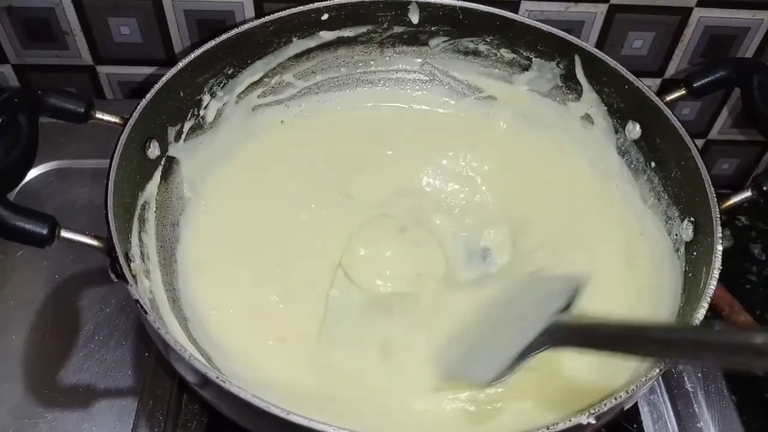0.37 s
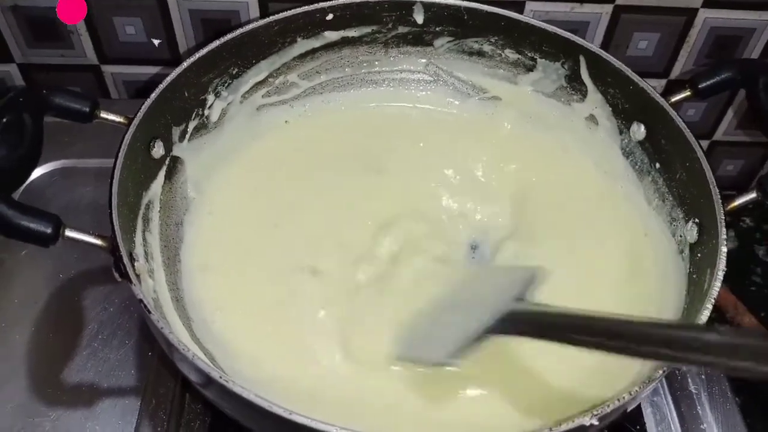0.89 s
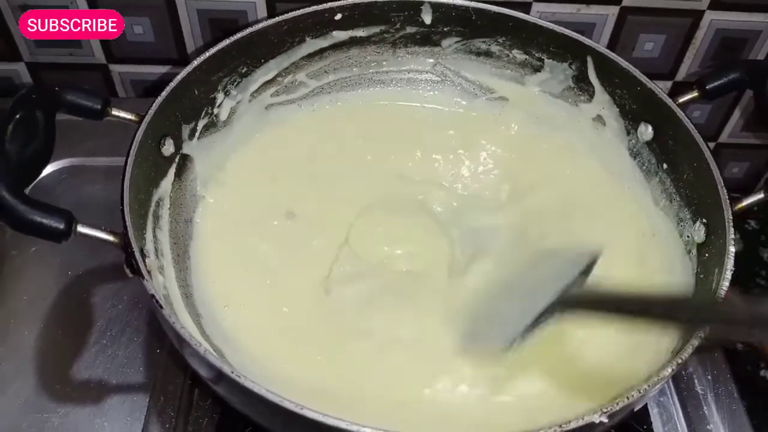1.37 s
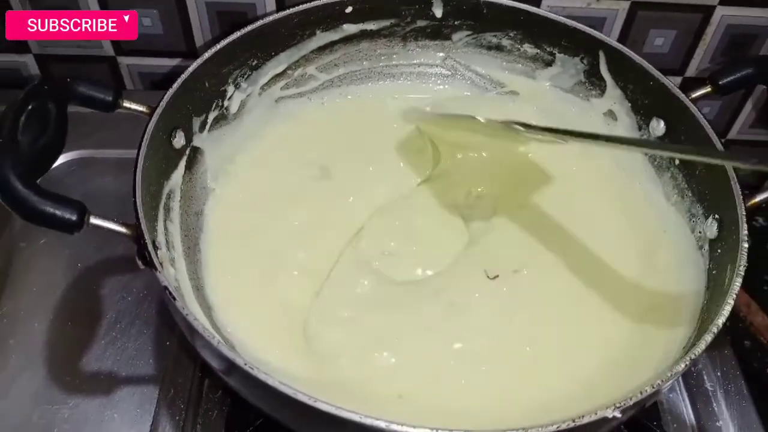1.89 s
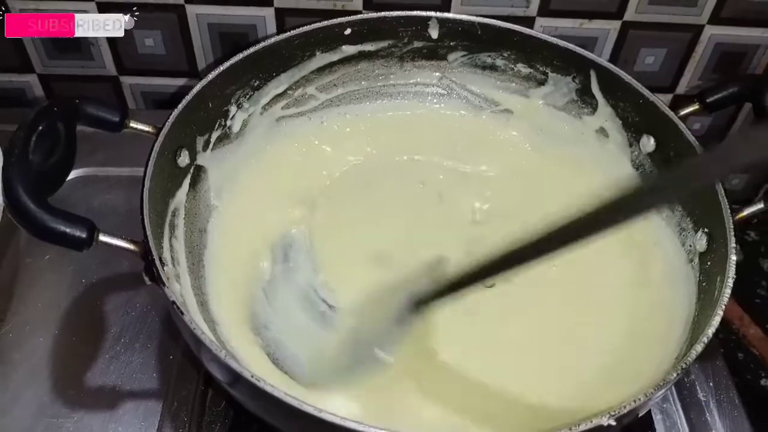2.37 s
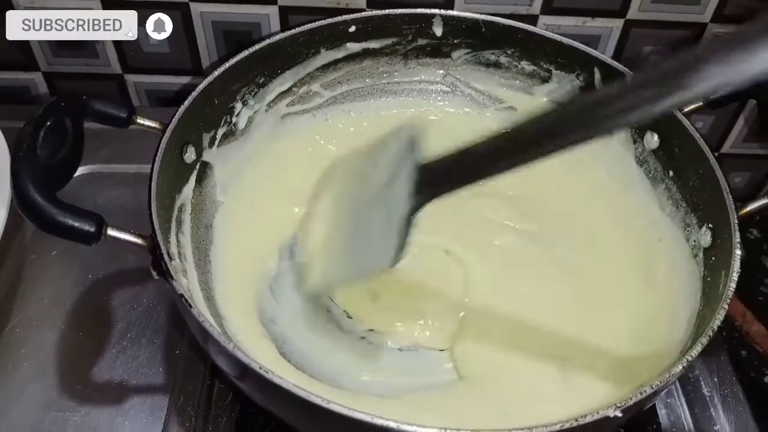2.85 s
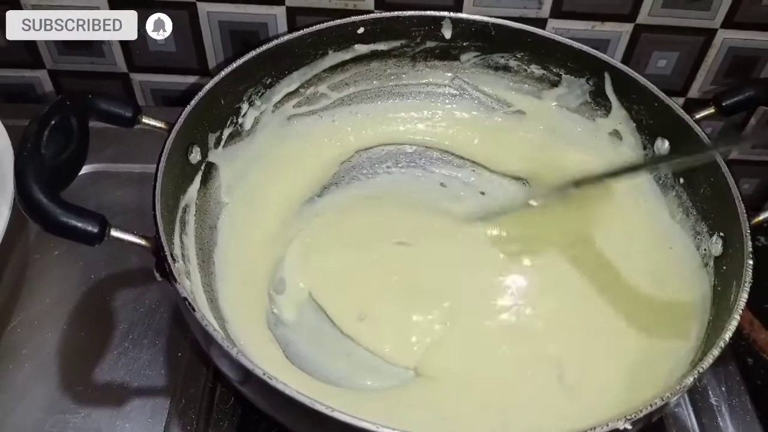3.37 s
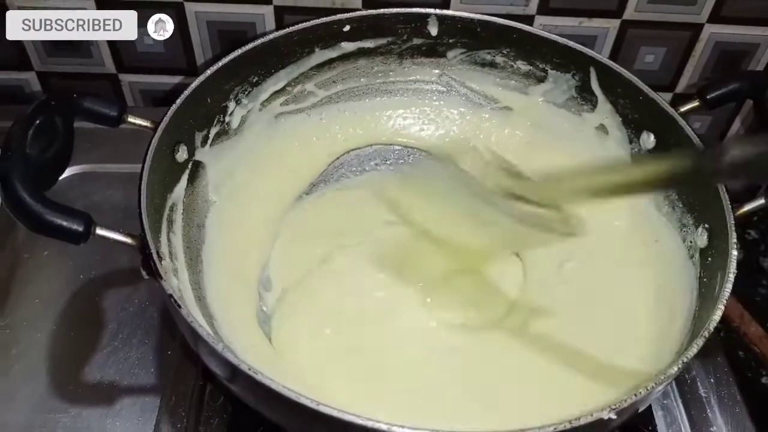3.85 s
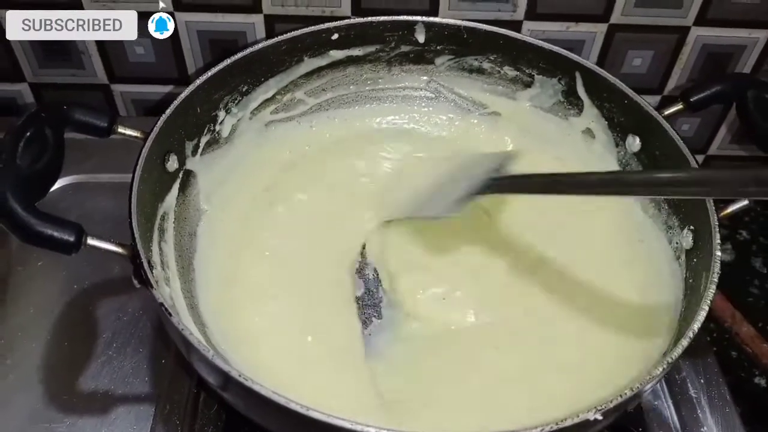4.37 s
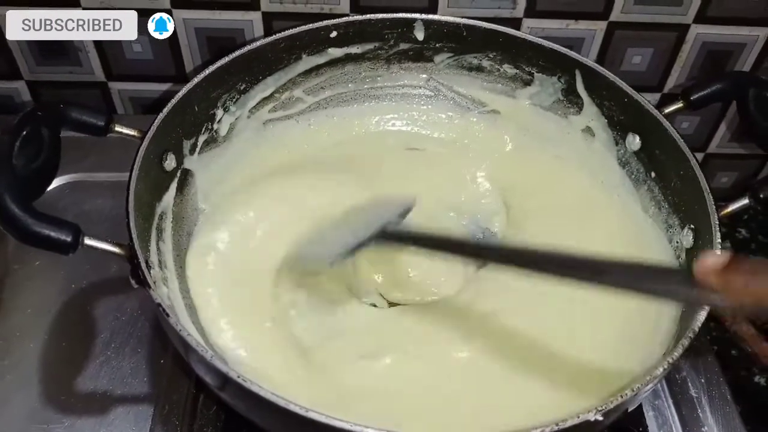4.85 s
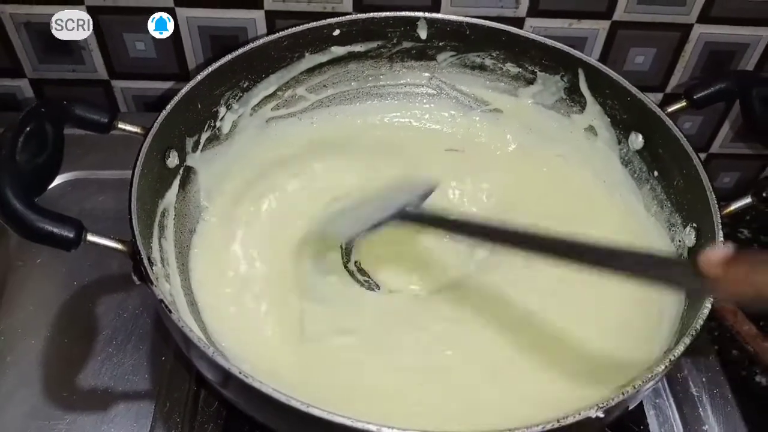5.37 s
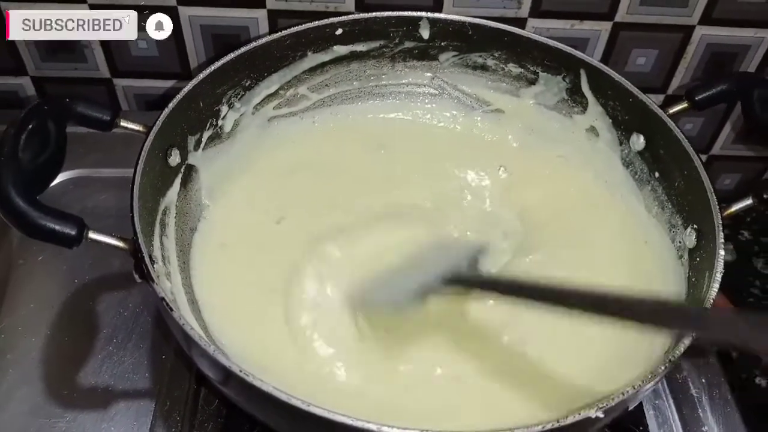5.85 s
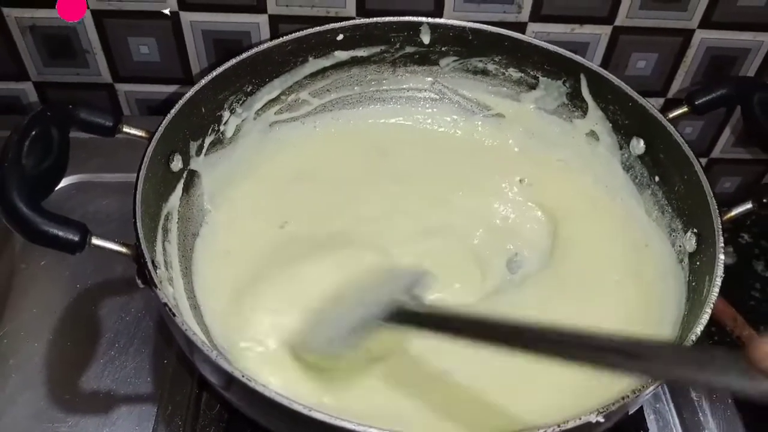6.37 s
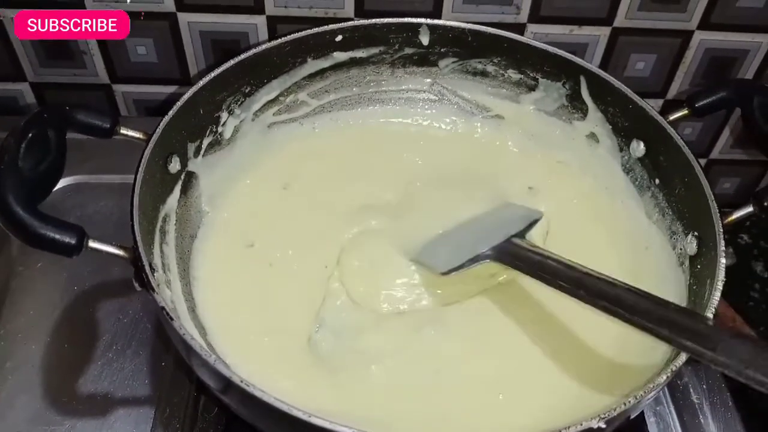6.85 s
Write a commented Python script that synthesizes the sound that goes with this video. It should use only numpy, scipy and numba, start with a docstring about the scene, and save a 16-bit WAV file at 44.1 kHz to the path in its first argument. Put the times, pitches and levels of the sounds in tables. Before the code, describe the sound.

A spatula rasps in repeated sweeping strokes through thick sauce in a metal pan, with sharp scraping knocks and a faint bird calling outside.

```python
"""A steel spatula stirs a thick sauce in a deep pan on a kitchen stove, close to a phone, for seven seconds.
From the start a steady room rumble and hiss lie under the strokes: stick-slip friction feeds damped pan modes.
Soon a bird outside repeats calls of falling whistles, and a narrow resonance trills as an insect now and then.
Then the edge also begins to knock the pan: short force pulses ring the same modes.
Strokes and knocks go on to the end, the edge running up the side wall in three spells."""
import sys
import numpy as np
from scipy import signal
from scipy.fft import rfft, irfft, next_fast_len
from scipy.io import wavfile
from scipy.ndimage import uniform_filter1d
from numba import njit

SR = 44100
rng = np.random.default_rng(int(sys.argv[2]) if len(sys.argv) > 2 else 0)


def to_linear_factor(level_db):
    """Convert decibel levels (scalar or array-like) to linear amplitude factors."""
    exponent = np.asarray(level_db, float) / 20
    return 10 ** exponent


def digitize_waveform(pressure):
    """Quantize a signal to 16-bit integers and store it at the path in sys.argv[1].

    Rows of a 2-D input are taken as channels; values are limited to [-1, 1].
    """
    field = np.atleast_2d(pressure).T
    bounded = np.clip(field, -1, 1)
    quanta = np.round(bounded * 32767).astype(np.int16)
    wavfile.write(sys.argv[1], SR, quanta)


N = 307818
T = np.arange(N) / SR
BANDS_HZ = 30 * 2 ** np.arange(0, 9, 1 / 3)

# Sweeps of the edge over the pan. Each row: time of full pressure in s, time since landing in s,
# time until lifting in s, rasp level in dB, wall ring and blade ring in dB relative to the rasp.
STROKES = [(0.03, 0.15, 0.24, -32, -6, -7.5), (0.234, 0.068, 0.049, -36, -12.5, -14),
           (0.548, 0.15, 0.3, -35.5, -5, -2.5), (.77, 0.088, 0.076, -37.5, -9, -10),
           (0.928, 0.049, 0.031, -49.5, -9, -9), (1.112, 0.2, 0.17, -34, -4.5, -4.5),
           (1.288, 0.13, 0.069, -36, -4, -10.5), (1.55, 0.062, 0.42, -42.5, -20, -7),
           (1.709, .21, 0.1, -31, -5.5, -5), (1.971, 0.075, 0.23, -49, 9.5, -26),
           (2.18, 0.21, 0.38, -41, 5.5, -18), (2.44, 0.18, 0.18, -33.5, -4, -6.5),
           (2.57, 0.17, 0.085, -36.5, -3.5, -12), (3.038, 0.013, 0.079, -36, 9, -10),
           (3.361, 0.28, 0.2, -34.5, 3.5, -8.5), (3.519, 0.29, 0.12, -34, -4.5, -7),
           (3.642, 0.012, 0.069, -41, 0, -1), (4.149, 0.052, 0.32, -36, -1, -8),
           (4.289, 0.2, 0.14, -33.5, -2, -3), (4.42, 0.063, 0.045, -44.5, -5.5, -2),
           (4.495, .01, 0.049, -47.5, -6, -11), (4.635, 0.014, 0.039, -44.5, 3, 3),
           (4.811, 0.21, 0.2, -32, -5, -4), (5.039, 0.089, 0.049, -33.5, -9, -13),
           (5.182, 0.022, 0.055, -38.5, -0.5, 0), (5.388, 0.17, 0.17, -30, -4.5, -5),
           (5.59, 0.057, 0.078, -31, -7.5, -11.5), (5.779, 0.023, 0.034, -46.5, -4, 1.5),
           (5.931, 0.14, .16, -32.5, -3.5, -4.5), (6.111, 0.082, 0.051, -42, -5, -5.5),
           (6.341, 0.086, 0.33, -34.5, -8.5, -2.5), (6.457, 0.18, 0.16, -33, -4.5, -10),
           (6.649, 0.17, 0.047, -43, -5, -21), (6.89, 0.044, 0.14, -41, 0, -1)]
# Share of the rasp's swell in dB that is followed. In order: by wall ring, by blade ring.
SWELL_SHARE = [0.99, 1]
# Knocks of the edge. Each row: start in s, treble level in dB, boom and wall ring in dB relative to the treble.
KNOCKS = [(0.4163, -41.5, -1, 10), (0.724, -24, -14, -3), (1.128, -33, -21, -2.5), (1.499, -39, -9, -15),
          (1.7146, -19, -12, -1), (1.9009, -29, -6, 11), (2.0048, -42, -16, 23), (2.1217, -29.5, -2, 3),
          (2.196, -39, -27, 12), (2.316, -42.5, 7, 22), (2.444, -27.5, -32, 0), (2.473, -39, 6, -14),
          (2.513, -28, -22, 12), (3.0277, -19, 1.5, 16), (3.0407, -32, 10, 7), (3.316, -32, -17, 13),
          (3.38, -34, -3, 9.5), (3.407, -28, -3, 10.5), (3.6335, -30.5, -11, -5),
          (4.1069, -15.5, -1.5, -3.5), (4.488, -33, -28, -8.5), (4.4955, -39, -20, -6),
          (4.6251, -39, -8, 5), (5.172, -49, -25, 0), (5.768, -47.5, -14, 12), (6.091, -30.5, -12, -7),
          (6.2573, -46.5, 0, 9), (6.542, -36.5, -10, 12), (6.855, -30, -11, -2), (6.8696, -21.5, -8, -6),
          (6.8967, -39, 13.5, -21.5)]
# Build-up time constants of a knock. In order: boom, wall ring, blade ring and treble, in s.
BUILD_S = [0.0021, 0.0017, .0004, 0.00049]
# Decay time constants of a knock. In order: boom, wall ring, blade ring and treble, in s.
RATTLE_S = [0.0046, 0.003, 0.0033, 0.0046]
# Pan modes, damped by the sauce. Each row: frequency in Hz, 60 dB decay time in s,
# level in dB relative to the ring level, gain in dB while the edge runs up the side wall.
PAN_MODES = [(145, 0.054, -13.5, 4), (232, 0.096, 5.5, 2.5), (324.2, 0.1, 6.5, 0.5),
             (452.6, 0.064, 1.5, -7.5), (530.8, 0.11, 3.5, -1), (643.4, 0.22, -14.5, 7),
             (797, 0.054, -19.5, 3.5), (1087, 0.028, -9.5, 9), (1296.5, 0.05, -4, 6.5),
             (1426, 0.23, -7.5, -9), (1619, 0.08, -1.5, -16), (1738, 0.029, 3, -7.5),
             (2177, 0.02, -12.5, 9.5), (2582, 0.089, -5.5, -0.5), (2768, 0.058, -4, -2.5),
             (3060, 0.026, -10, 0.5), (3280, 0.09, -6, -9), (3544, 0.062, -9, -1), (4043, 0.018, -16, 10),
             (4800, 0.023, -12.5, -0.5), (5640, 0.041, -9.5, -2), (6360, 0.0021, -7, 4),
             (6757, 0.02, -4, -0.5), (7330, 0.011, -15, 5)]
# Broad rasp between the modes. Each row: frequency in Hz, level in dB per third octave relative to the bare edge.
RASP_SPECTRUM = [(100, -23), (200, -8), (400, -8.5), (900, -21.5), (1400, 8.5), (2000, -30), (2500, 7.5),
                 (3200, 6.5), (3600, -0.5), (5000, -1.5), (7000, -7), (10000, -69.5), (13000, -15)]
# Low bowl modes come and go as the edge crosses their nodes. Each row: time in s,
# level in dB below 280 Hz, from 280 to 390 Hz, from 390 to 720 Hz.
LOW_DRAG = [(0.0, -47, -56.5, -38), (0.15, -69, -67, -50.5), (0.21, -46, -79, -68), (0.25, -49, -59, -80),
            (0.37, -100, -86, -78), (0.449, -62, -48.5, -54), (0.52, -44, -54, -61),
            (0.58, -47.5, -56, -80), (0.62, -49, -58, -43.5), (0.72, -48, -59, -67), (0.8, -55, -53, -58),
            (0.85, -92, -68, -79), (1.07, -55, -50.5, -56.5), (1.16, -71.5, -49.5, -38),
            (1.34, -48, -61, -84), (1.44, -104, -80, -80), (1.63, -54.5, -36.5, -52),
            (1.75, -50.5, -57, -45), (1.87, -101, -104, -89), (1.902, -47.5, -39.5, -46.5),
            (2.14, -55, -41.5, -43.5), (2.19, -58, -49, -43.5), (2.45, -42.5, -44, -35),
            (2.599, -60, -43.5, -37), (2.78, -80, -89, -93), (2.99, -79, -71.5, -66),
            (3.031, -38, -45.5, -54), (3.21, -59.5, -49, -41.5), (3.28, -46, -51, -37.5),
            (3.36, -58.5, -38, -37), (3.56, -55.5, -47, -37.5), (3.58, -41, -51, -59),
            (3.67, -45.5, -48, -56), (3.79, -76, -84, -80), (4.04, -94, -93, -85), (4.12, -40, -37, -45),
            (4.2, -45.5, -56, -63), (4.28, -48, -49, -43.5), (4.57, -64, -82, -88), (4.67, -50, -56.5, -55),
            (4.74, -56, -43.5, -85), (4.82, -65, -50, -40.5), (4.98, -56.5, -67, -57),
            (5.05, -49.5, -48, -61), (5.11, -71, -70, -54.5), (5.29, -46, -53, -59), (5.46, -61, -50, -41),
            (5.56, -51, -63, -70), (5.6, -44, -43, -43.5), (5.66, -49, -59, -60.5), (5.72, -70, -70, -62),
            (5.91, -52, -45, -54.5), (6.08, -55.5, -70, -69), (6.119, -65, -45.5, -48),
            (6.2, -80, -69, -84), (6.42, -38.5, -44.5, -39), (6.47, -49, -48, -38.5), (6.8, -89, -79, -95),
            (6.879, -37.5, -38.5, -45), (6.98, -44, -51, -49)]
# Gain of the rasp above 7.5 kHz. Each row: time in s, gain in dB.
TOP_TREBLE = [(0.0, 1), (0.5, -1), (1.2, 1.5), (1.7, -1.5), (2.5, -0.5), (3.1, 8), (3.3, 2), (3.7, 1.5),
              (4.2, 0), (5.3, 2.5), (6.2, -1), (6.98, -1)]
# Spells on the side wall. Each row: start in s, end in s.
SIDE_WALL = [(1.9, 2.7), (3.02, 3.75), (6.85, 7.2)]
# Bird calls. Each row: start in s, number of notes, relative level in dB.
BIRD_CALLS = [(0.238, 2, -56.5), (0.77, 2, -58), (1.248, 2, -57.5), (1.763, 2, -57), (2.1, 3, -57.5),
              (2.64, 2, -58), (2.872, 2, -57), (3.126, 2, -56.5), (3.911, 3, -57), (4.487, 2, -58.5),
              (5.051, 2, -57), (6.09, 2, -56), (6.634, 2, -57)]
# Insect trills. Each row: start in s, length in s, relative level in dB.
TRILLS = [(0.27, 0.11, -66), (2.89, 0.19, -64), (3.693, 0.086, -68.5), (6.696, 0.25, -64)]
# Room floor. Each row: frequency in Hz, level in dB per third octave.
ROOM_SPECTRUM = [(30, -100), (100, -74.5), (140, -80), (400, -83.5), (900, -86.5), (1580, -78),
                 (2000, -87.5), (2700, -78.5), (4500, -81), (5700, -78), (7000, -61), (9500, -62.5),
                 (11500, -66)]
# The two microphones. Each row: frequency in Hz, left minus right in dB, likeness from 0 to 1.
PORTS = [(60.4, -3, 0.98), (202, 3, 1), (750, 2.5, 0.98), (1240, 7, 0.98), (1870, 2.5, 1), (4750, 3, 0.97),
         (7330, -1.5, 0.98), (7830, -8, 0), (8400, -16, 0.3), (11300, -15.5, 0.8), (13100, 0, 0.4)]
# Spectral gate threshold: weak bins fall near silent. Each row: frequency in Hz, power in dB per bin.
GATE = [(1500, -106), (2200, -98.5), (6000, -92), (10000, -85.5), (13000, -82)]


def pan():
    """Modal superposition: a travelling contact feeds each mode and each broad band unevenly."""
    force_rub, force_blow = rubbing(), striking()
    ring_db, edge_db = -8, -10  # how strongly the modes and the bare edge radiate
    detune, detune_per_s = 0.035, 7  # share of pitch, by sauce and pressing edge; less above 400 Hz
    swing_db = 0.87  # opposite swing at each microphone as the edge travels
    on_wall = sum((T > start) & (T < end) for start, end in SIDE_WALL)

    def drive(hz, slow_db, quick_db):
        """Position-dependent coupling: the rub's feed to one frequency wanders, the blow's does not."""
        row = np.searchsorted([280, 390, 720, 1950, 3400], hz)
        slow_db = slow_db * (hz > 720)
        uneven_db = slow_db * walk(11) + quick_db * walk(45)
        return force_rub[row] * to_linear_factor(np.minimum(uneven_db, 7.0)) + force_blow[row]

    def swung(x):
        """Level-difference panning: one sound sways between two microphones."""
        return x * to_linear_factor(swing_db * walk(5) * np.array([[1], [-1]]))

    out = np.zeros((2, N))
    for hz, t60, db, wall_db in PAN_MODES:
        force = to_linear_factor(ring_db + db + wall_db * on_wall) * drive(hz, slow_db=5.0, quick_db=3.5)
        bent_hz = hz * (1 + detune * walk(detune_per_s) * np.sqrt(min(400 / hz, 1)))
        out += swung(mode(force, bent_hz, t60))
    for hz in BANDS_HZ[3:]:
        bare = band(drive(hz, slow_db=2.0, quick_db=2.5), hz)
        out += swung(to_linear_factor(edge_db + on_log(RASP_SPECTRUM, hz)) * bare)
    return np.array([echoes(side, t60=0.12, wet_db=-13.0) for side in out])


def rubbing():
    """Frictional excitation: three rows of low bowl drag, then wall ring, blade ring and treble."""
    rub = rasp()
    top = signal.sosfiltfilt(signal.butter(3, 7500, "high", fs=SR, output="sos"), rub)
    rub = rub + (to_linear_factor(np.interp(T, *np.array(TOP_TREBLE).T)) - 1) * top
    time, *levels_db = np.array(LOW_DRAG).T
    drag = to_linear_factor(np.array([np.interp(T, time, db) for db in levels_db])) * slips(spread_db=2.5, judder_db=1.5)
    # the bowl is dragged only while the edge rubs
    touch = np.minimum(uniform_filter1d(np.abs(rub).sum(axis=0), size=300) / to_linear_factor(-59), 1)
    return low_pass_rows(np.vstack([touch * drag, rub]))


def rasp():
    """Pressure-controlled friction: each sweep's rubbing force swells and eases with contact pressure."""
    landing_db, lifting_db, roundness = -19.5, -22, 1.52  # under full pressure; exponent of the swell
    off_db_per_s = -700  # further change once the edge is off the pan
    power = np.zeros((3, N))
    for full, rise, fall, db, ring_db, blade_db in STROKES:
        late = T - full
        before_db = landing_db * np.abs(late / rise) ** roundness
        after_db = lifting_db * np.abs(late / fall) ** roundness
        swell_db = np.where(late < 0, before_db, after_db)
        # lands quicker than it leaves
        off_db = off_db_per_s * (np.maximum(late - fall, 0) + 3 * np.maximum(-late - rise, 0))
        first = max(int((full - rise) * SR) - SR // 10, 0)
        near = slice(first, int((full + fall) * SR) + SR // 2)
        for part, (colour_db, share) in enumerate(zip([ring_db, blade_db, 0], [*SWELL_SHARE, 1])):
            power[part, near] += to_linear_factor(db + colour_db + share * swell_db[near] + off_db[near]) ** 2
    return np.sqrt(power) * slips(spread_db=3.5, judder_db=1.21)


def slips(spread_db, judder_db):
    """Stick-slip friction: dense ticks of very uneven size come in judders; power 1."""
    ticks = rng.standard_normal(N) * to_linear_factor(spread_db * np.minimum(rng.exponential(size=N), 5))
    ticks = ticks * to_linear_factor(judder_db * walk(60) + 0.1 * judder_db * walk(26))
    return ticks / np.std(ticks)


def striking():
    """Impulsive excitation: two rows of deep modes, then boom, wall ring, blade ring and treble."""
    blow = knocks()
    deep = to_linear_factor(-6.5) * blow[[0, 0]]  # relative to the boom
    return low_pass_rows(np.vstack([deep, blow]))


def knocks():
    """Contact mechanics: a sharp first contact rattles out in a few milliseconds, cushioned by the sauce."""
    blade_db = -9  # relative to the treble
    force = np.zeros((4, N + SR))
    t = T[:int(.08 * SR)]
    build = np.minimum(t / np.array(BUILD_S)[:, None], 1)
    fade = np.exp(-t / np.array(RATTLE_S)[:, None]) * build
    for t0, db, boom_db, ring_db in KNOCKS:
        jolts = rng.standard_normal(len(t)) * fade
        # every knock spends its whole energy
        even = np.linalg.norm(fade, axis=1) / np.linalg.norm(jolts, axis=1)
        rattle = 0.86 * jolts * even[:, None] + 1.53 * (t == 0)
        level = to_linear_factor(db + np.array([boom_db, ring_db, blade_db, 0]))
        force[:, int(t0 * SR):][:, :len(t)] += level[:, None] * rattle
    cushion = signal.butter(1, 12000, fs=SR, output="sos")
    return signal.sosfilt(cushion, force[:, :N])


def low_pass_rows(force):
    """Low-pass filtering: the first four force rows are kept below about 2 kHz."""
    force[:4] = signal.sosfilt(signal.butter(4, 2100, fs=SR, output="sos"), force[:4])
    return force


def bird():
    """Frequency glide: short whistles fall in pitch and are blurred by reflections from walls outside."""
    gap_s, first_db, first_drop_hz = 0.053, -2.5, 71  # note spacing; the opening note is softer and lower
    t = np.linspace(0, 1, int(0.0372 * SR))
    swell = np.hanning(len(t)) ** 0.39
    out = np.zeros(N)
    pitch_factors = 1 + 0.0095 * rng.standard_normal(size=(len(BIRD_CALLS), 3))
    for (t0, notes, db), lifts in zip(BIRD_CALLS, pitch_factors):
        for k in range(round(notes)):
            i = int((t0 + k * gap_s) * SR)
            hz = lifts[k] * (3240 - first_drop_hz * (k == 0) - 520 * t)
            whistle = np.sin(2 * np.pi * np.cumsum(hz) / SR)
            out[i:i + len(t)] += to_linear_factor(db + first_db * (k == 0)) * swell * whistle
    out = out * to_linear_factor(2.1 * walk(130))  # a slightly hoarse throat
    out = out + to_linear_factor(-5.0) * np.roll(out, int(.0085 * SR))  # a near wall beats against the falling pitch
    out = out + to_linear_factor(-14.5) * np.roll(out, int(.085 * SR))  # a far wall answers
    return echoes(to_linear_factor(2.5) * out, t60=0.23, wet_db=13.0)


def insect():
    """Narrow-band resonance: throbbing noise drives one wing mode near five kilohertz."""
    level = np.zeros(N)
    for t0, length, db in TRILLS:
        level += to_linear_factor(db) * np.clip(np.minimum(T - t0, t0 + length - T) / .015, 0, 1)
    wing = mode(rng.standard_normal(N) * level * to_linear_factor(3.4 * walk(70)), hz=5110, t60=0.023)
    return signal.sosfilt(signal.butter(2, [4800, 5350], "band", fs=SR, output="sos"), wing)


def room():
    """Filtered noise: low rumble and high hiss flicker a little around a faint narrow whir in the mids."""
    out = to_linear_factor(-74.5 + 3.0 * walk(4.94)) * mode(rng.standard_normal(N), hz=1625, t60=0.036)  # whir
    for hz in BANDS_HZ:
        level = to_linear_factor(on_log(ROOM_SPECTRUM, hz) + 1.86 * walk(7.4))
        out += level * band(rng.standard_normal(N), hz)
    return out


def mode(x, hz, t60):
    """Damped resonance that radiates no bass; white input of power 1 comes out with power 1."""
    r = np.exp(-np.log(1000) / (t60 * SR))
    return ring(x + 1e-18, 2 * np.pi * hz / SR * np.ones(N), r) * np.sqrt((1 - r * r) / 2)


@njit
def ring(x, turn, r):
    """Two-pole resonance: the angle per sample may move, the pole radius sets the damping."""
    y = np.zeros(len(x))
    for i in range(2, len(x)):
        y[i] = x[i] - x[i - 2] + 2 * r * np.cos(turn[i]) * y[i - 1] - r * r * y[i - 2]
    return y


def band(x, hz):
    """Third-octave filtering: white input of power 1 comes out with power 1."""
    edges = hz * 2 ** (np.array([-1, 1]) / 6)
    steep = signal.butter(3, edges, "band", fs=SR, output="sos")
    return signal.sosfilt(steep, x) * np.sqrt(SR / 2 / np.ptp(edges))


def walk(rate):
    """Slow random modulation: levels held 1 / rate s and slewed; spread near 1."""
    k = int(SR / rate)
    held = np.repeat(rng.standard_normal(N // k + 1), k)
    return 1.237 * uniform_filter1d(held, k)[:N]


def echoes(x, t60, wet_db):
    """Diffuse reverberation: the direct sound gains an exponentially fading noise tail."""
    t = np.arange(int(SR * t60)) / SR
    tail = rng.standard_normal(len(t)) * np.exp(-np.log(1000) * t / t60)
    return x + to_linear_factor(wet_db) * signal.fftconvolve(x, tail / np.linalg.norm(tail))[:N]


def on_log(table, hz, column=1):
    """Logarithmic frequency scale: a table column is interpolated along log frequency."""
    table = np.array(table)
    return np.interp(np.log(hz), np.log(table[:, 0]), table[:, column])


def scene():
    """Linear superposition: all sources add at both microphones."""
    return pan() + bird() + insect() + room()


def gate_bins(x, depth_db):
    """Spectral gating: bins are turned down as their smoothed power nears or falls under the threshold."""
    hz, _, z = signal.stft(x, SR, nperseg=1024)
    power = np.mean(np.abs(z) ** 2, axis=0)
    power = uniform_filter1d(uniform_filter1d(power, size=5, axis=0), size=2, axis=1)
    gain = 1 - to_linear_factor(2 * on_log(GATE, hz + 1))[:, None] / (power + 1e-18)
    return signal.istft(z * np.maximum(gain, to_linear_factor(depth_db)), SR, nperseg=1024)[1][:, :N]


def roll_off(x):
    """The treble ends steeply here."""
    return signal.sosfilt(signal.butter(12, 14240, fs=SR, output="sos"), x)


def record(dry):
    """Linear filtering: bass and top are cut; the duller left port hears treble mostly by scattered reflections."""
    size = next_fast_len(N + SR)
    hz = np.maximum(np.arange(size // 2 + 1) * SR / size, 1)
    tilt_db = on_log(PORTS, hz)
    like = np.clip(on_log(PORTS, hz, column=2), 0, 1)
    scatter = rng.standard_normal(12000) * np.exp(-np.arange(12000) / 2200)
    left = like + np.sqrt(1 - like ** 2) * rfft(scatter / np.linalg.norm(scatter), size)
    share = np.sqrt(2 / (1 + to_linear_factor(np.array([[-2], [2]]) * tilt_db)))  # left and right keep their summed power
    cut = 1 / np.sqrt(1 + (110 / hz) ** 3.3) / np.sqrt(1 + (hz / 13200) ** 80)
    ports = np.array([left, 1 + 0 * left])
    heard = irfft(rfft(dry, size) * ports * share * cut, size)[:, :N]
    gated = gate_bins(heard, depth_db=-18)
    return roll_off(gated)


dry = scene()
out = record(dry)
digitize_waveform(out)
```